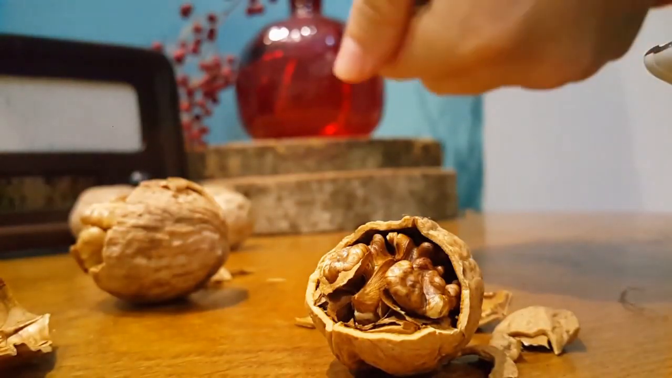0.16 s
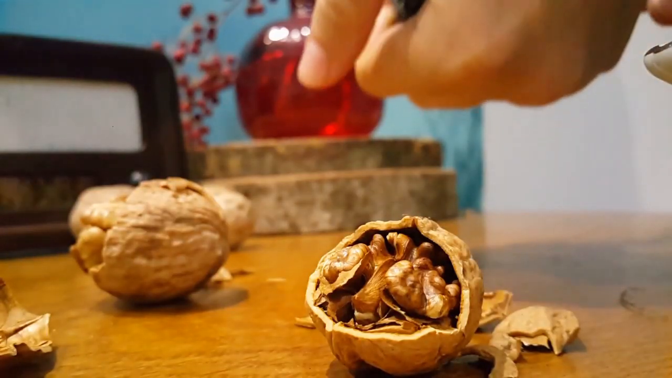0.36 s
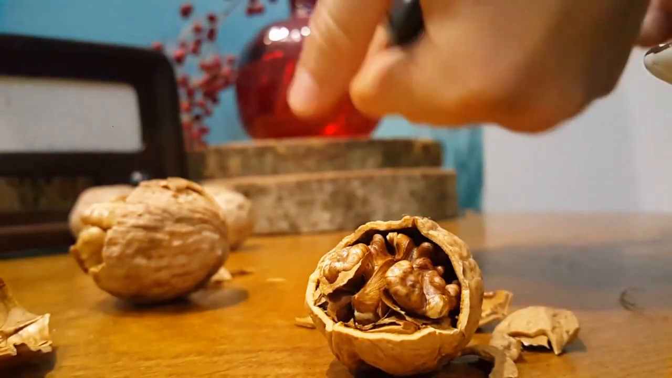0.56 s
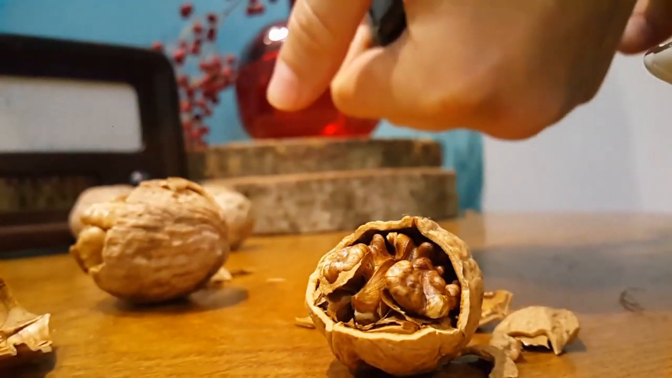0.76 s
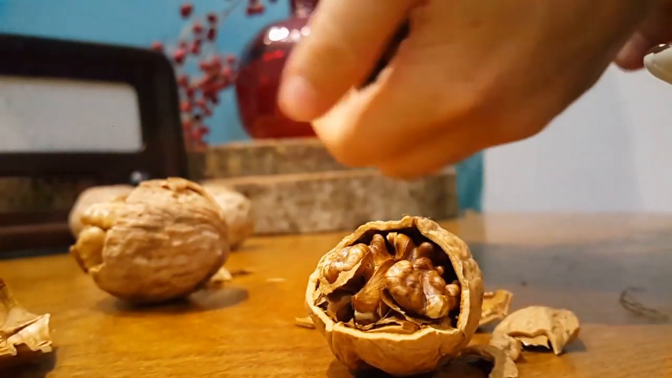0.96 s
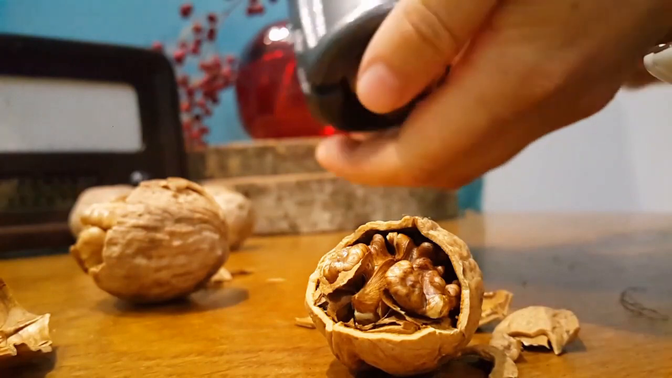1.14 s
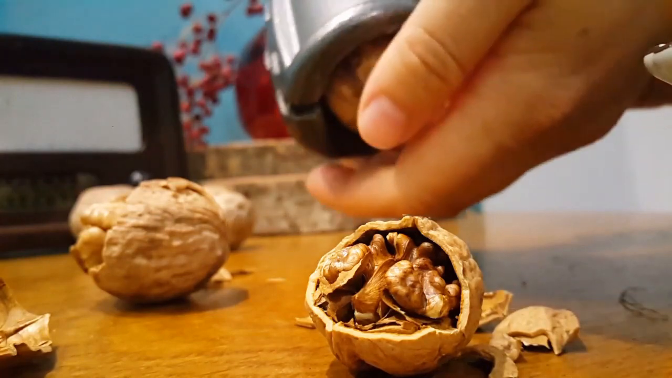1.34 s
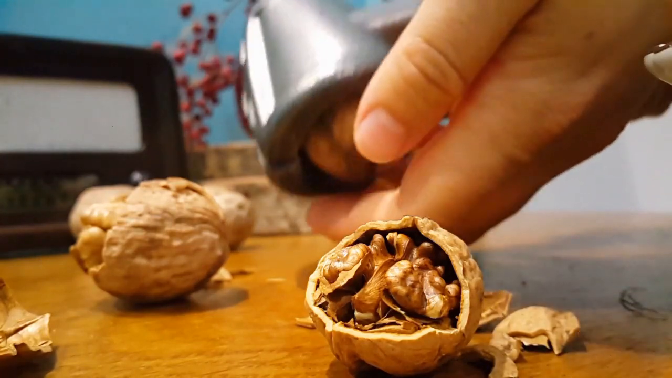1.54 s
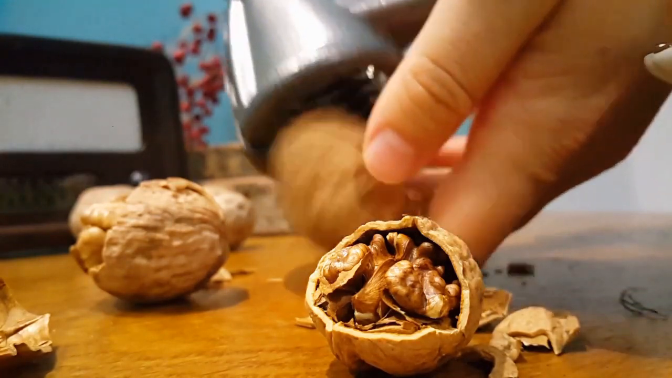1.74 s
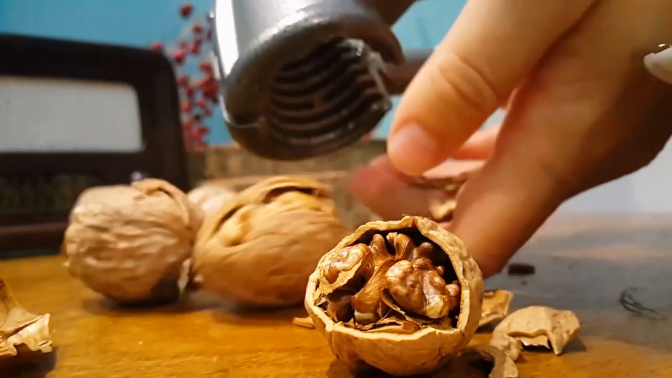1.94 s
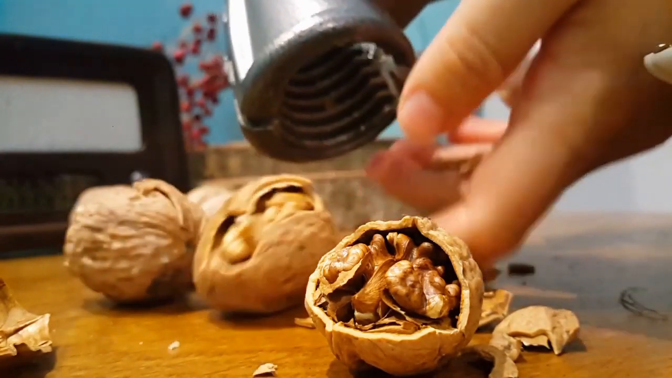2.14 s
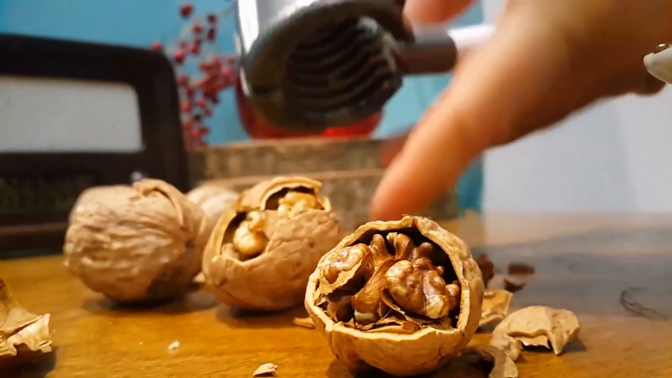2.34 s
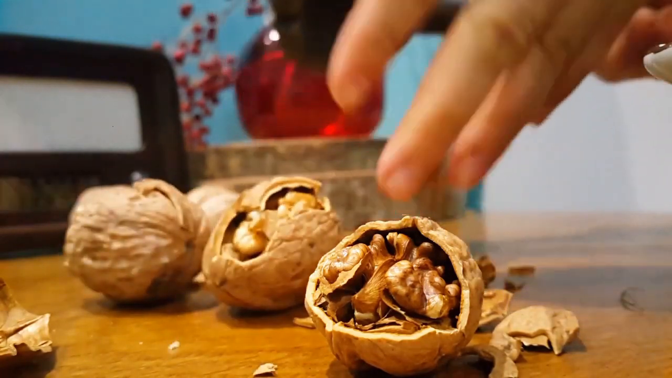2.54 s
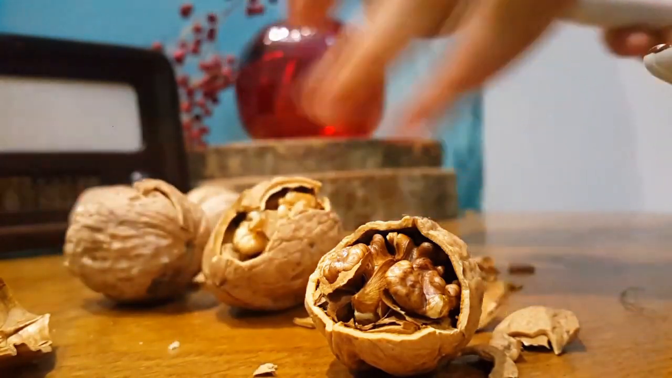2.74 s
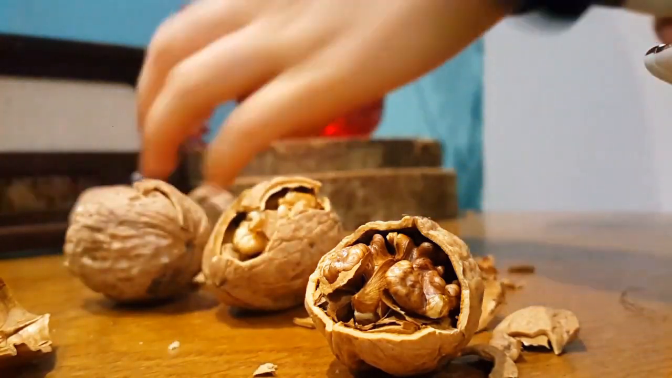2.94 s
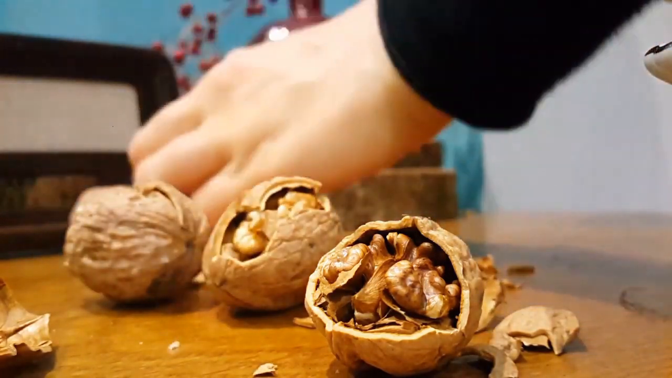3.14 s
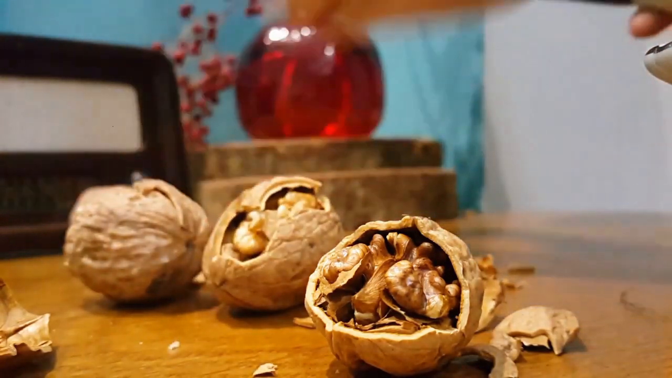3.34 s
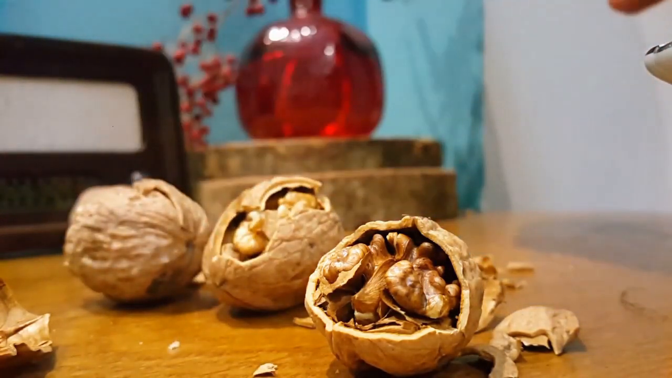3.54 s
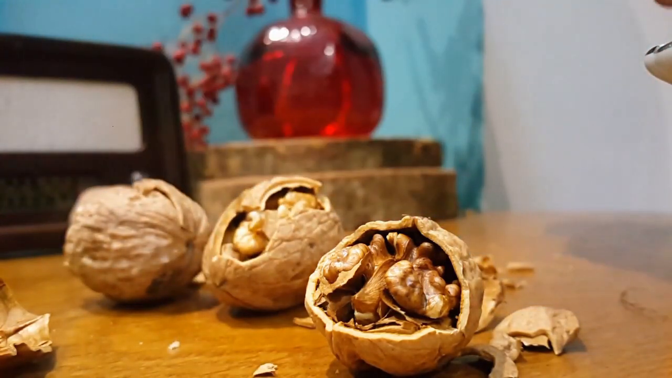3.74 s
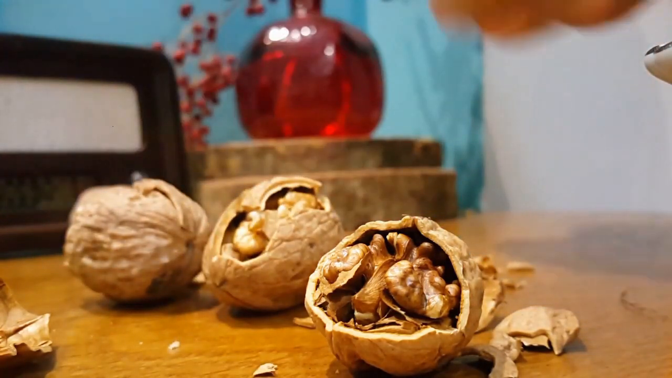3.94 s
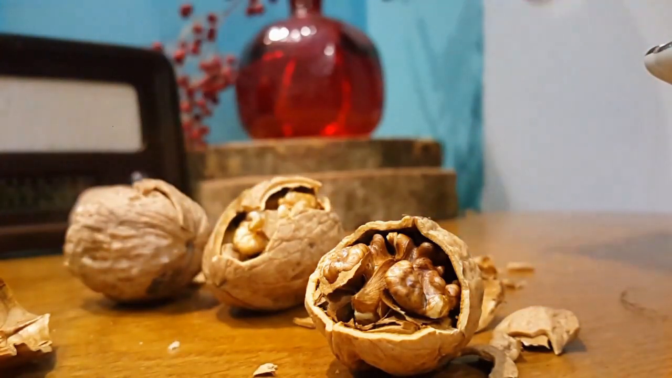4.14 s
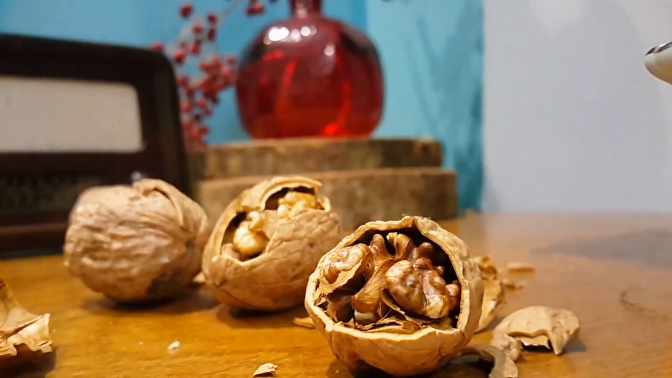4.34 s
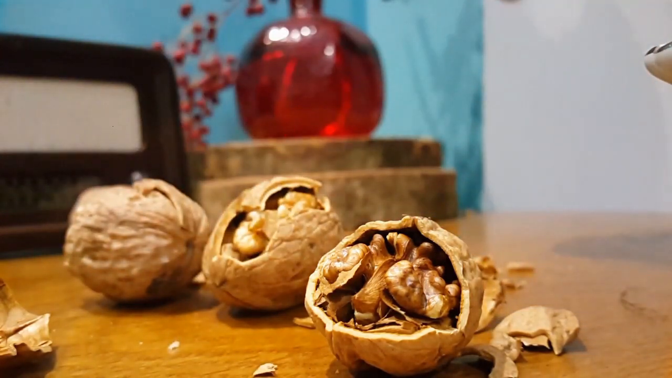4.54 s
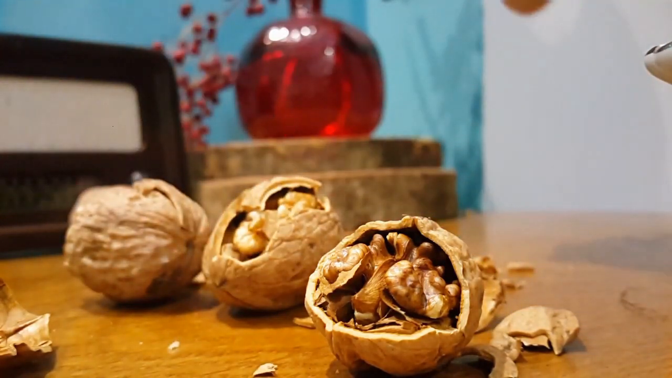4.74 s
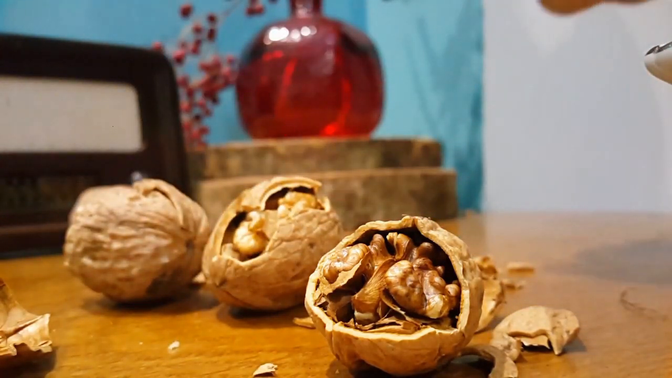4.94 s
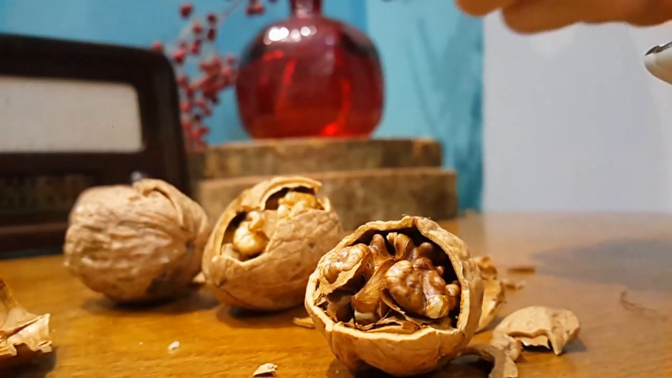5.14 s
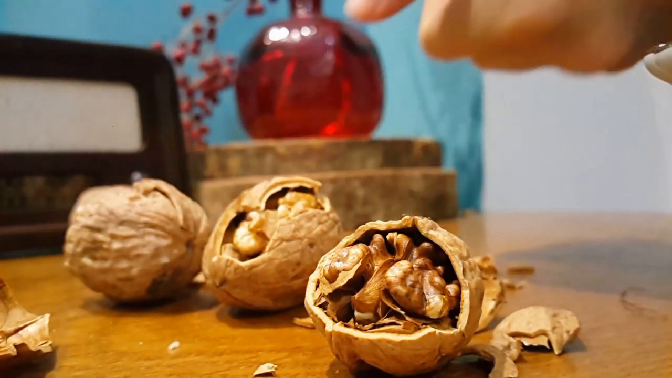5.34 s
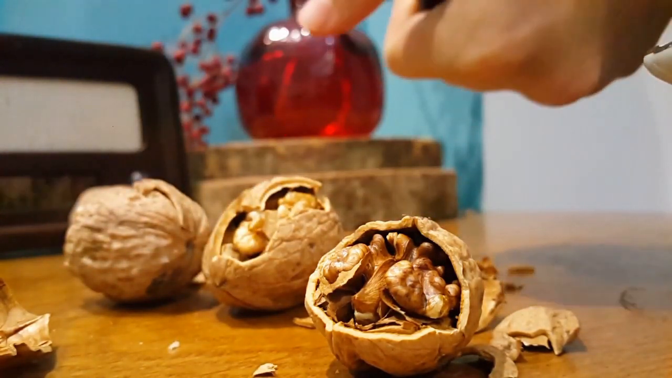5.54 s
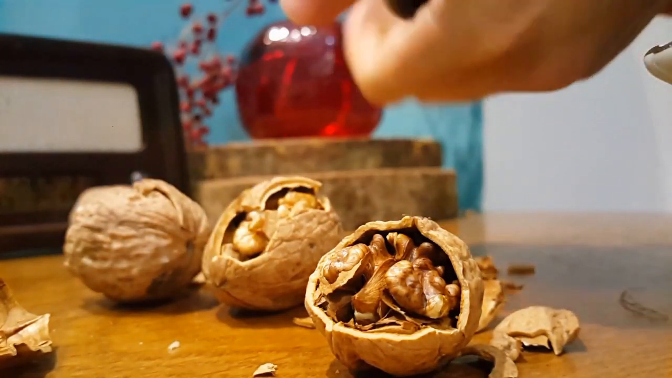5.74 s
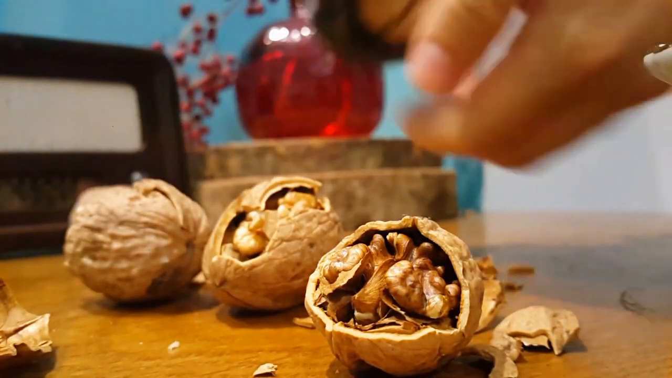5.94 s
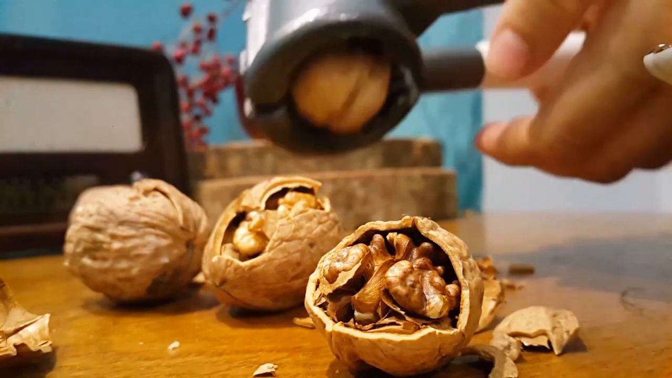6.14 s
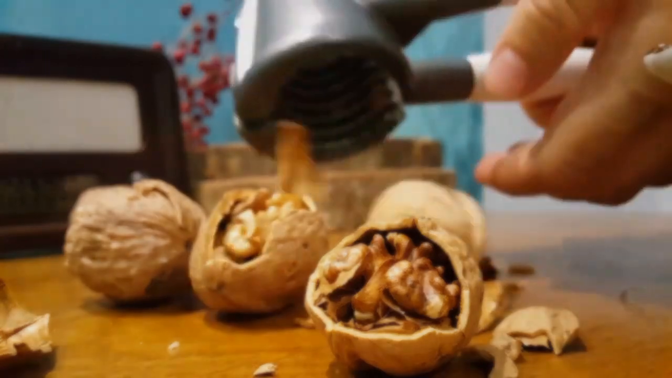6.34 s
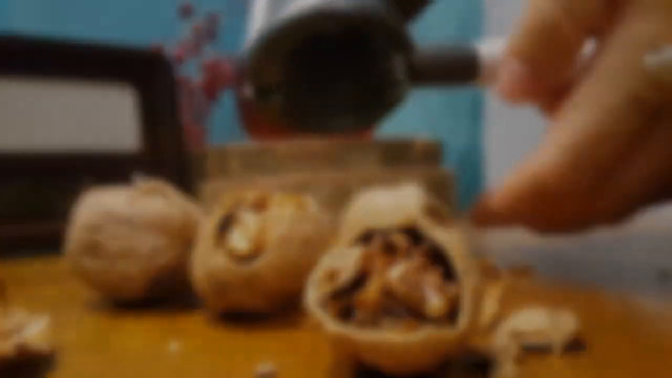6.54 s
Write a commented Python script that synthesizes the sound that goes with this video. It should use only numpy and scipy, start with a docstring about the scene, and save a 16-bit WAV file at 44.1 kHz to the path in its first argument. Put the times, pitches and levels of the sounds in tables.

```python
"""Walnut shells snap in short volleys in a hand-held lever nutcracker above a wooden kitchen table.
Each crack is shaped noise: a hollow ring, a high snap, splinters, a thump and a grinding trail.
Nuts knock, slip and squeak in the metal cup, crumbs tick, and two cracked nuts drop and rock on the wood.
Close reflections, narrow resonances and a live room answer, over dull air noise and a faint hum."""
import sys
import numpy as np
from scipy import signal
from scipy.fft import rfft, irfft
from scipy.io import wavfile
from scipy.ndimage import uniform_filter1d

SR = 44100
rng = np.random.default_rng(int(sys.argv[2]) if len(sys.argv) > 2 else 0)


def put_to_file(sound):
    """Save the sound as 16-bit audio at rate SR, in the file named by the first command-line argument."""
    columns = np.atleast_2d(sound).T  # one column per channel
    safe = np.clip(columns, -1, 1)
    whole_steps = np.round(safe * 32767)
    wavfile.write(sys.argv[1], SR, whole_steps.astype(np.int16))


N = 295029
CLICK_SAMPLES = 4096
CLICK_AGE_S = np.arange(CLICK_SAMPLES) / SR


def amp(db):
    """Convert dB to an amplitude factor."""
    return 10 ** (np.asarray(db) / 20)


def sized(x, db):
    """Give a stereo click the energy of 5 ms at this level."""
    energy = np.sum(x ** 2) / 2 / (.005 * SR)
    return x * amp(db) / np.sqrt(energy + 1e-20)


def add(track, start_s, x):
    """Mix a stereo sound in at a time."""
    start = max(int(start_s * SR), 0)
    track[:, start:start + x.shape[1]] += x[:, :max(N - start, 0)]


def place(near, far, start_s, x, room_db):
    """A sound reaches the ears directly and also feeds the room."""
    add(near, start_s, x)
    add(far, start_s, x * amp(room_db))


def panned(x, left_db):
    """Lean a sound left by a level difference between the ears."""
    return x * amp(np.array([[left_db], [-left_db]]) / 2)


def lagged(x, delay_s):
    """Sound from the left reaches the right ear a moment later."""
    count = np.arange(x.shape[1])
    right = np.interp(count - np.round(delay_s * SR), count, x[1])
    return np.array([x[0], right])


def band(x, low_hz, high_hz, order=2):
    """Causal band-pass."""
    sos = signal.butter(order, [low_hz, min(high_hz, .48 * SR)], "band", fs=SR, output="sos")
    return signal.sosfilt(sos, x)


def ring(x, hz, width_hz):
    """One damped resonance: the narrower, the longer it rings."""
    return signal.lfilter(*signal.iirpeak(hz, hz / width_hz, fs=SR), x)


def along(points, hz, column=1):
    """Read a table column on a log-frequency axis."""
    points = np.array(points)
    return np.interp(np.log(hz + 1), np.log(points[:, 0]), points[:, column])


def coloured(x, points):
    """Causal minimum-phase filter through (Hz, dB) points."""
    hz = np.fft.rfftfreq(CLICK_SAMPLES, 1 / SR)
    cepstrum = irfft(np.log(amp(along(points, hz))))
    # fold the cepstrum so that the response starts at once
    cepstrum[1:CLICK_SAMPLES // 2] *= 2
    cepstrum[CLICK_SAMPLES // 2 + 1:] = 0
    response = irfft(np.exp(rfft(cepstrum)))
    return signal.fftconvolve(x, response[None], axes=1)[:, :x.shape[1]]


def pair(size, alike):
    """Stereo noise with a share of power common to both ears."""
    alike = np.clip(alike, 0, 1)
    common = np.sqrt(alike) * rng.standard_normal(size)
    return common + np.sqrt(1 - alike) * rng.standard_normal((2, size))


def volley(decay_s, alike=.5, grain=0.71, smooth_hz=350):
    """A run of tiny fractures swells and dies within milliseconds, evened out across the spectrum."""
    envelope = CLICK_AGE_S / decay_s * np.exp(-CLICK_AGE_S / decay_s)
    unevenness = np.exp(grain * rng.standard_normal(CLICK_SAMPLES))
    spectrum = rfft(pair(CLICK_SAMPLES, alike) * unevenness * envelope)
    smooth_bins = max(int(smooth_hz * CLICK_SAMPLES / SR), 1)
    power = uniform_filter1d(np.abs(spectrum) ** 2, smooth_bins, axis=1)
    return irfft(spectrum / np.sqrt(power + 1e-20)) * (CLICK_AGE_S < 10 * decay_s)


def grind(length_s, db, hz, width_hz, rate_hz=1500, spread_db=14):
    """Many tiny slips of uneven size swell and fade as the pressure passes, through one resonance."""
    t = np.arange(SR // 4) / SR
    happens = rng.random(len(t)) < rate_hz / SR
    size = amp(-spread_db * rng.random(len(t)))
    slips = happens * size * np.sign(pair(len(t), alike=0.25))
    pressed = (slips * np.sin(np.pi * t / length_s))[:, t < length_s]
    x = band(ring(pressed, hz, width_hz), 1100, 15000)
    return x * amp(db) / (np.std(x) + 1e-12)


def splinters(db, top_hz=14000):
    """Fibres part with a very short, bright tick."""
    return sized(band(volley(decay_s=.001, alike=.2), 3800, top_hz), db)


# Shell fractures, and at 4.351 s the nut slipping in the cup with a thump.
# Each row: time in s, hollow ring in dB, ring in Hz, splinters in dB, room feed in dB.
SHELL_CRACKS = [(0.2385, -11, 1800, -13, 3.5), (0.6687, -36, 2430, -29, -3),
                (0.7487, -13.5, 2010, -18.5, 1.5), (4.2938, -30, 2050, -32.5, -1.5),
                (4.3202, -44, 2180, -32, 0), (4.351, -18, 1910, -34, 5.5), (4.451, -48, 2160, -37.5, 1.5),
                (4.8731, -22.5, 2145, -26.5, 0.5), (4.94, -25, 2100, -32.5, -24),
                (4.972, -17.5, 2170, -23, 5), (5.003, -18.5, 2070, -22, 0), (5.216, -22, 2150, -17.5, -1),
                (5.2222, -14.5, 1950, -19, 8), (5.4437, -27, 2250, -26, -6.5),
                (5.6067, -40, 2450, -29.5, -5), (5.6322, -20, 1750, -21.5, -0.5)]
# In this span the shell is still closed: it rings narrowly and creaks. Otherwise it is broken.
CLOSED_START_S, CLOSED_END_S = 4, 5.1
CLOSED_WIDTH_HZ, BROKEN_WIDTH_HZ = 164, 940
CREAK_DB, CREAK_WIDTH_HZ = -23, 150  # dB relative to the ring
DEBRIS_DB, DEBRIS_HZ, DEBRIS_WIDTH_HZ = -19.5, 3000, 350  # dB relative to the ring
TRAIL_DELAY_S, TRAIL_S = .005, .062
# dB of a broken shell's snap and any thump at a ring of HARD_DB; growth in dB per dB of ring
HARD_DB = -13
SNAP_DB, SNAP_GROWTH = -18.5, 3.5
THUMP_DB, THUMP_GROWTH = -32, 1.3
CLOSED_SNAP_DB = 1.5  # relative to the splinters


def cracks(near, far, overtone=1.65, snap_width_hz=1100, left_db=0.7, trail_room_db=-2):
    """The shell snaps (once, the nut slips) at a high mode over its hollow ring; a grinding trail follows."""
    for time_s, ring_db, hz, splinter_db, room_db in SHELL_CRACKS:
        force_db = ring_db - HARD_DB
        if CLOSED_START_S < time_s < CLOSED_END_S:
            width_hz = CLOSED_WIDTH_HZ
            snap_db = splinter_db + CLOSED_SNAP_DB
            trail = grind(TRAIL_S, ring_db + CREAK_DB, hz, CREAK_WIDTH_HZ)
        else:
            width_hz = BROKEN_WIDTH_HZ
            snap_db = SNAP_DB + SNAP_GROWTH * force_db
            trail = grind(TRAIL_S, ring_db + DEBRIS_DB, DEBRIS_HZ, DEBRIS_WIDTH_HZ)
        hollow = ring(volley(decay_s=0.0011, alike=.7), hz, width_hz)
        hollow = sized(band(hollow, 1150, 3500, order=3), ring_db)
        snap = ring(volley(decay_s=0.0017, alike=.25), overtone * hz, snap_width_hz)
        snap = sized(band(snap, 3600, 8500), snap_db)
        shell = panned(hollow + snap + splinters(splinter_db), left_db)
        thump = jolt(THUMP_DB + THUMP_GROWTH * force_db)
        place(near, far, time_s - .0003, shell + thump, room_db)
        place(near, far, time_s + TRAIL_DELAY_S, trail, trail_room_db)


# Spectrum of the dull jolt. Each row: frequency in Hz, relative level in dB.
JOLT_COLOUR = [(30, -16.5), (90, -5.5), (160, 1), (330, 2.5), (600, -8), (1000, -3.5), (1800, -33)]


def jolt(db, left_db=5):
    """A dull shock runs through the lever."""
    shock = coloured(volley(decay_s=0.00057, alike=0.55), JOLT_COLOUR)
    return panned(sized(shock, db), left_db)


# The lever jolts as the nut gives way or, at 4.35 s, slips in the cup.
# Each row: time in s, level in dB.
LEVER_JOLTS = [(0.2391, -11.5), (0.7492, -28.5), (4.35, -26), (5.2213, -32.5)]


def lever(near, far, room_db=2):
    """The handles jump together when the nut yields or slips."""
    for time_s, db in LEVER_JOLTS:
        place(near, far, time_s, jolt(db), room_db)


# A nut knocks against the metal cup. Each row: time in s, level of the hollow in dB.
CUP_KNOCKS = [(3.7066, -14.5), (3.7225, -26), (3.741, -27), (3.749, -21.5), (3.7611, -29), (3.7816, -28.5),
              (3.813, -26), (3.8379, -24), (3.842, -31), (3.968, -44), (6.4324, -45), (6.483, -38.5)]
KNOCK_HZ = 2290
GRAZE_DB, GRAZE_S = -26.5, .055  # dB relative to the knock


def knocks(near, far, width_hz=280, room_db=-8, dull_db=-8, splinter_db=-31, scatter=0.051):
    """A nut bounces in the cup: a dull contact, the ring of its hollow and a short graze."""
    for time_s, db in CUP_KNOCKS:
        hz = KNOCK_HZ * np.exp(scatter * rng.standard_normal())
        contact = volley(decay_s=0.00044, alike=0.53)
        hollow = sized(band(ring(contact, hz, width_hz), 1600, 2800), db)
        dull = sized(band(contact, 900, 2900), db + dull_db)
        x = hollow + dull + splinters(db + splinter_db)
        place(near, far, time_s - .0002, x, room_db)
        graze = grind(GRAZE_S, db + GRAZE_DB, hz=2040, width_hz=350)
        place(near, far, time_s, graze, room_db=3)


# The shell slips in the cup.
# Each row: time of the peak in s, level in dB, pitch in Hz, half length in s, room feed in dB.
SHELL_SQUEAKS = [(4.3566, -8, 1969, 0.0033, -1.5), (4.392, -23.5, 2022, 0.0037, 10.5),
                 (4.619, -29.5, 4157, 0.0068, -10)]


def squeaks(near, far, second_db=-22, third_db=-31, left_db=-3, wander_rad=0.013):
    """Stick-slip locks on to the hollow of the nut for a brief run of uneven cycles."""
    peak_s = CLICK_AGE_S[CLICK_SAMPLES // 2]
    for time_s, db, hz, half_s, room_db in SHELL_SQUEAKS:
        wander = wander_rad * np.cumsum(rng.standard_normal(CLICK_SAMPLES))
        phase = 2 * np.pi * hz * CLICK_AGE_S + wander
        tone = sum(amp(gain_db) * np.sin(k * phase)
                   for k, gain_db in enumerate([0, second_db, third_db], 1))
        swell = np.exp(-((CLICK_AGE_S - peak_s) / half_s) ** 2)
        x = sized(panned(tone * swell, left_db), db)
        place(near, far, time_s - peak_s, x, room_db)


TICK_HZ, PITCH_SCATTER = 2640, .06  # pieces differ in size by about this share


def tick(db, splinter_db, width_hz=1100):
    """A small piece of shell catches and lets go."""
    hz = TICK_HZ * np.exp(PITCH_SCATTER * rng.standard_normal())
    body = band(ring(volley(decay_s=0.0014), hz, width_hz), 990, 6000)
    return sized(body, db) + splinters(splinter_db, top_hz=11300)


# Shell edges catch. Each row: time in s, ring in dB, splinters in dB.
EDGE_TICKS = [(.198, -53, -54.5), (0.63, -48, -39.5), (0.7247, -64, -37), (1.5367, -52.5, -58),
              (1.628, -48, -61), (1.7264, -53.5, -60.5), (1.873, -44.5, -50), (1.9063, -55, -46.5),
              (2.165, -41, -61), (2.173, -46.5, -57), (2.407, -63, -53.5), (2.8254, -62, -52.5),
              (3.9543, -42.5, -60), (4.5992, -32.5, -51.5), (4.672, -38.5, -71), (5.131, -51, -34.5),
              (5.4827, -55, -33.5), (5.601, -49, -44), (6.477, -39, -45.5), (6.561, -52, -39),
              (6.6281, -53, -38)]


def ticks(near, far, room_db=-3):
    """Single shell edges catch under the fingers and the lever."""
    for time_s, db, splinter_db in EDGE_TICKS:
        place(near, far, time_s - .0003, tick(db, splinter_db), room_db)


RASP_START_S, RIB_GAP_S = 1.392, 0.012
RASP_DB, RASP_SPLINTER_DB = -48, -51.5  # before the spread from rib to rib


def rasp(near, far, room_db=-2, jitter=0.21, spread_db=2, count=8):
    """The cracked nut slides out of the cup, skipping unevenly over its ribs, one tick a rib."""
    for k, (late, size) in enumerate(rng.standard_normal((count, 2))):
        x = tick(RASP_DB, RASP_SPLINTER_DB) * amp(spread_db * size)
        place(near, far, RASP_START_S + RIB_GAP_S * (k + jitter * late), x, room_db)


# Fingers loosen crumbs. Each row: start in s, length in s, mean level in dB.
CRUMB_SPELLS = [(1.752, 0.27, -62.5), (2.3, 0.13, -75), (5.467, .14, -52.5), (6.299, 0.25, -62)]
CRUMB_SPREAD_DB, CRUMB_SPLINTER_DB = 2.5, 2  # splinters relative to the tick


def crumbs(near, far, room_db=-2, count=6):
    """A few faint ticks are scattered at random over each spell of handling."""
    for start_s, length_s, db in CRUMB_SPELLS:
        for when, size in zip(rng.random(count), rng.standard_normal(count)):
            level_db = db + CRUMB_SPREAD_DB * size
            x = tick(level_db, level_db + CRUMB_SPLINTER_DB)
            place(near, far, start_s + when * length_s, x, room_db)


# A shell grinds on its own pieces, the cup or the table.
# Each row: start in s, length in s, level in dB, centre in Hz, width in Hz.
SHELL_RUBS = [(0.263, .14, -27, 3477, 5510), (2.049, .15, -68.5, 2220, 1290),
              (2.375, 0.18, -66.5, 1650, 594), (4.502, 0.21, -50.5, 1983, 200),
              (4.732, 0.11, -56, 2115, 119), (6.395, 0.085, -53, 2000, 202)]


def rubs(near, far, room_db=-2):
    """A shell creeps over broken shell, metal or wood."""
    for start_s, length_s, db, hz, width_hz in SHELL_RUBS:
        place(near, far, start_s, grind(length_s, db, hz, width_hz), room_db)


# Modes of the table top. Each row: frequency in Hz, width in Hz, relative level in dB.
TABLE_MODES = [(116, 10, 4.5), (162, 28, 2), (258, 12, 7), (388, 58, 1.5), (670, 180, -4), (844, 79, -20),
               (1045, 39, 4.5), (1330, 71, -12), (2700, 51, -23)]


def table(db, settle_s=0.027):
    """The nut chatters briefly on the wooden top and sets its modes ringing."""
    t = np.arange(SR // 2) / SR
    chatter = pair(len(t), alike=0.85) * np.exp(-t / settle_s)
    modes = sum(amp(gain_db) * ring(chatter, hz, width_hz) for hz, width_hz, gain_db in TABLE_MODES)
    return sized(band(modes, 110, 3000), db)


# A cracked nut lands on the table.
# Each row: time in s, shell in dB, splinters in dB, table in dB, room feed of the shell in dB.
NUT_DROPS = [(2.0517, -19, -31, -29, -3.5), (6.5437, -22.5, -31, -35, -10)]
# Colour of a shell striking wood. Each row: frequency in Hz, relative level in dB.
SHELL_COLOUR = [(100, -62), (600, -21), (1000, 7), (1300, 11), (1900, 1), (2550, 12.5), (3000, 6.5),
                (3700, 3), (5000, -7), (12000, -12.5)]
ROCK_GAP_S, ROCK_STRETCH, ROCK_DB = .053, 1.13, -4.5  # first gap, factor per gap, change per rock


def drops(near, far, table_room_db=-3, count=5):
    """A cracked nut hits the table and rocks to rest, each rock slower and softer."""
    for time_s, shell_db, splinter_db, table_db, room_db in NUT_DROPS:
        shell = sized(coloured(volley(decay_s=0.0013, alike=0.11), SHELL_COLOUR), shell_db)
        x = shell + splinters(splinter_db, top_hz=11800)
        place(near, far, time_s - .0002, x, room_db)
        add(near, time_s, table(table_db))
        delays_s = np.cumsum(ROCK_GAP_S * ROCK_STRETCH ** np.arange(count))
        for k, delay_s in enumerate(delays_s, 1):
            place(near, far, time_s + delay_s, table(table_db + k * ROCK_DB), table_room_db)


# Soft low bumps: muffled contacts, and the low thud under the crack near 5.22 s.
# Each row: start in s, level in dB, centre in Hz, decay in s, room feed in dB.
SOFT_BUMPS = [(3.325, -47.5, 439, 0.029, -9), (3.334, -40.5, 735, 0.026, 3),
              (4.2643, -36, 165, 0.00082, -1.5), (5.2203, -32, 171.8, 0.0021, -14),
              (5.2227, -42, 60, 0.0014, -15.5)]


def bumps(near, far):
    """Muffled contacts and the low thud under a crack: noise in a low band swells and decays."""
    for start_s, db, hz, decay_s, room_db in SOFT_BUMPS:
        envelope = CLICK_AGE_S * np.exp(-2 * CLICK_AGE_S / decay_s)
        push = pair(CLICK_SAMPLES, alike=0.98) * envelope
        x = sized(band(push, hz * 0.55, hz * 1.23), db)
        place(near, far, start_s, x, room_db)


# Reflections from the table and nearby things. Each row: delay in s, level in dB.
CLOSE_ECHOES = [(.0016, -14.5), (.0088, -17), (0.0177, -21.5)]


def reflections(near):
    """Hard surfaces close by repeat each sound."""
    out = near.copy()
    for delay_s, db in CLOSE_ECHOES:
        add(out, delay_s, lagged(near, delay_s=.0002) * amp(db))
    return lagged(out, delay_s=.00007)


# Narrow resonances of the room's answer.
# Each row: frequency in Hz, width in Hz, level in dB before the common trim.
NARROW_MODES = [(1483, 3.6, 0), (1630, 12, -4), (1926, 12, -3), (2360, 4.2, 2), (2900, 42, 1.5),
                (2990, 10, -4), (3460, 20, -4.5), (3930, 9.3, -3), (5100, 10, -0.5)]


def narrow_resonances(far, trim_db=-2):
    """Narrow resonances ring on faintly in the room after each shock."""
    return sum(amp(db + trim_db) * ring(far, hz, width_hz) for hz, width_hz, db in NARROW_MODES)


# The kitchen's echo. Each row: frequency in Hz, level in dB before the common trim, t60 in s.
ROOM_ECHO = [(60, -18, 0.69), (250, -27.5, 0.89), (692.5, -2, 0.32), (955, -5.5, .55), (1500, 3.5, 0.54),
             (2040, 0, 0.5), (2870, -1, 0.5), (4440, -0.5, 0.5), (6500, 2.5, 0.41), (11000, -0.5, 0.35),
             (16000, -8, 0.35)]


def kitchen(far, trim_db=-3.5, first_s=0.0013, build_s=0.0019):
    """Dense echoes build up within milliseconds and die away at their own rate in each band."""
    t = np.arange(SR) / SR
    hz = np.fft.rfftfreq(SR, 1 / SR)
    noise = rfft(pair(SR, alike=0.063))
    edges_hz = np.append(0, np.geomspace(90, SR / 2, num=17))
    onset = 1 - np.exp(-np.maximum(t - first_s, 0) / build_s)
    response = 0
    for low_hz, high_hz in zip(edges_hz[:-1], edges_hz[1:]):
        centre_hz = (low_hz + high_hz) / 2
        t60_s = along(ROOM_ECHO, centre_hz, column=2)
        tail = irfft(noise * (hz >= low_hz) * (hz < high_hz), SR)
        tail = tail * onset * amp(-60 * t / t60_s)
        # energy in proportion to bandwidth
        tail *= np.sqrt(2 * (high_hz - low_hz) / SR / np.sum(tail ** 2, axis=1, keepdims=True))
        response = response + tail * amp(along(ROOM_ECHO, centre_hz))
    return amp(trim_db) * signal.fftconvolve(far, response, axes=1)[:, :N]


# Course of the room tone. Each row: time in s, level in dB before the common trim.
TONE_COURSE = [(0.0, -56), (0.61, -58), (0.99, -66.5), (1.94, -64.5), (2.14, -62), (4.71, -52),
               (5.65, -67.5), (6.48, -63.5), (6.69, -60)]
# Colour of the air noise. Each row: frequency in Hz, relative level in dB.
TONE_COLOUR = [(18, -48), (30, -24), (64, -18), (92, -5), (219, -11), (307, -3.5), (420, -7.5), (606, -7.5),
               (996, -17), (1230, -15), (2130, -26), (2360, -25), (2830, -28), (4660, -27.5), (15500, -35)]
# Difference between the ears. Each row: frequency in Hz, side relative to mid in dB.
TONE_WIDTH = [(100, -12), (380, -9), (700, -2), (1300, 1.5), (15000, 1)]
# Hum of a kitchen appliance. Each row: frequency in Hz, level in dB where the air is at AIR_REF_DB.
HUM_PARTIALS = [(100.4, -66.5), (300.3, -66), (393, -70), (614, -69.5), (920, -74.5), (1249, -72)]
AIR_REF_DB = -58  # reference for the balance of air and hum


def room_tone(trim_db=-0.5, waver_rad=0.97):
    """Dull air noise, most alike in both ears in the bass, and a slightly wavering hum."""
    t = np.arange(N) / SR
    mid, side = coloured(rng.standard_normal((2, N)), TONE_COLOUR)
    side = coloured(side[None], TONE_WIDTH) * np.array([[1], [-1]])
    air = (mid + side) * amp(AIR_REF_DB) / np.std(mid)
    knots_s = np.linspace(0, t[-1], num=40)
    hum = 0
    for hz, db in HUM_PARTIALS:
        drift = np.interp(t, knots_s, rng.standard_normal(len(knots_s)))
        phase = 2 * np.pi * hz * t + waver_rad * drift * hz / HUM_PARTIALS[0][0]
        hum = hum + np.sqrt(2) * amp(db) * np.sin(phase)
    course_db = np.interp(t, *np.transpose(TONE_COURSE))
    return (air + hum) * amp(course_db - AIR_REF_DB + trim_db)


def scene():
    """All sounds of the nuts and the lever, with close reflections, resonances, room and tone."""
    near, far = np.zeros((2, N)), np.zeros((2, N))
    for source in (cracks, lever, knocks, squeaks, ticks, rasp, crumbs, rubs, drops, bumps):
        source(near, far)
    return reflections(near) + narrow_resonances(far) + kitchen(far) + room_tone()


TOP_HZ = 15400


def record(dry, ceiling=2.3):
    """The loudest snaps are rounded off; the top is cut."""
    rounded = ceiling * np.tanh(dry / ceiling)
    return signal.sosfilt(signal.ellip(8, .2, 70, TOP_HZ, fs=SR, output="sos"), rounded)


dry = scene()
out = record(dry)
put_to_file(out)
```